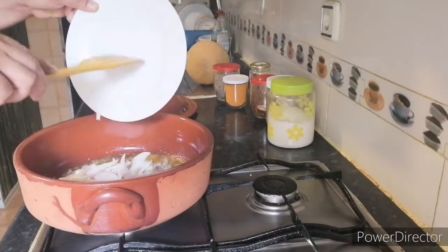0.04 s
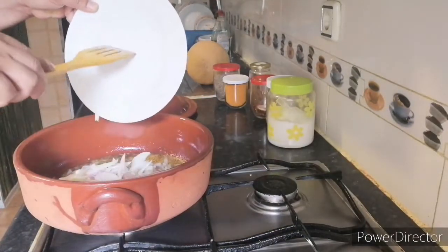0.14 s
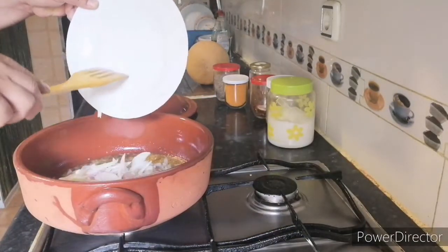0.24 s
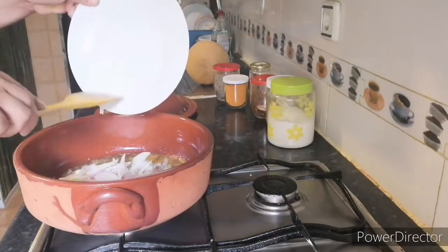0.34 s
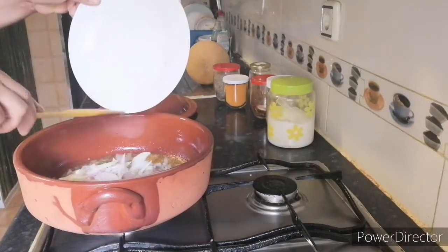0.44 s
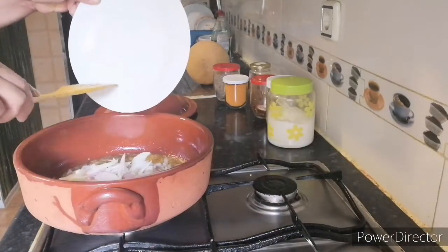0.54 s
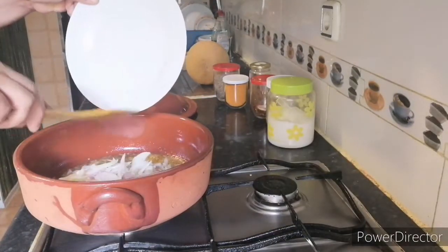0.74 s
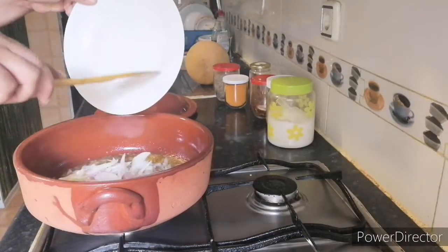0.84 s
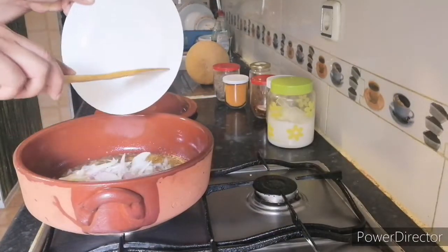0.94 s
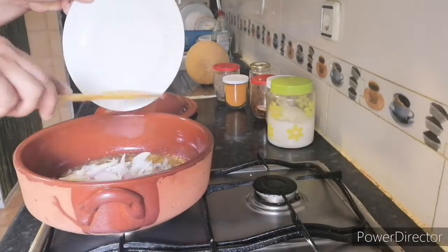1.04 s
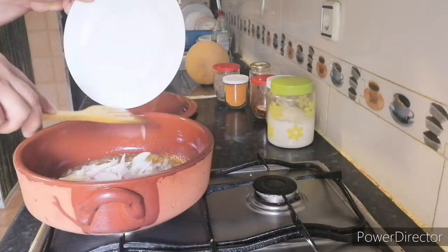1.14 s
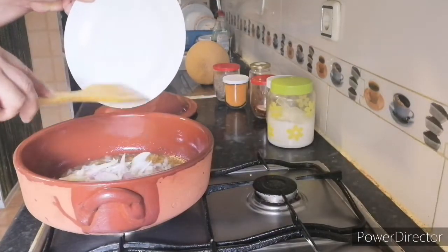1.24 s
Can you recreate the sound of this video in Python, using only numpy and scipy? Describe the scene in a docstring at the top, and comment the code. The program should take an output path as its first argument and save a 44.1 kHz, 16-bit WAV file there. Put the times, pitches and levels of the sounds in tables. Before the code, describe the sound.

Wooden spatula knocks on a china plate, two firm clacks and light taps over faint sizzling

```python
"""A wooden spatula knocks onion scraps off a china plate held over a clay pot: two firm knocks, a few light taps.
Each contact rings the plate and spatula as fading sine waves, with a woody thud pulse and a crack of noise.
The holding hand damps the plate, so each clack is short and the tiled kitchen carries it on as an echo.
The blade's soft wipes are brief swells of noise; onions sizzle faintly in the oil as hiss and random spits.
A low room rumble, also shaped noise, lies underneath."""
import sys
import numpy as np
from scipy import signal
from scipy.fft import rfft, irfft, next_fast_len
from scipy.io import wavfile
from scipy.ndimage import uniform_filter1d

SR = 44100
rng = np.random.default_rng(int(sys.argv[2]) if len(sys.argv) > 2 else 0)


def put_to_file(sound):
    """Save the sound as 16-bit audio at rate SR, in the file named by the first command-line argument."""
    columns = np.atleast_2d(sound).T  # one column per channel
    safe = np.clip(columns, -1, 1)
    whole_steps = np.round(safe * 32767)
    wavfile.write(sys.argv[1], SR, whole_steps.astype(np.int16))


N = 57330  # length in samples, 1.3 s


def amp(db):
    """Turns decibels into a gain: every 20 dB is a factor of ten."""
    return 10 ** (np.asarray(db) / 20)


def unit(x):
    """Scales a sound to an average (rms) strength of 1."""
    return x / np.sqrt(np.mean(x ** 2) + 1e-20)


def along(points, hz):
    """Reads a curve of (pitch_hz, value) points, with pitch spaced by ratio as the ear hears it."""
    point_hz, value = np.transpose(points)
    return np.interp(np.log(hz + 1), np.log(point_hz + 1), value)


def filtered(x, response):
    """Multiplies each frequency of a sound by the response at that frequency."""
    size = x.shape[-1]
    padded = next_fast_len(size + 8192)  # spare silence keeps the end from wrapping onto the start
    spectrum = rfft(x, padded) * response(np.fft.rfftfreq(padded, 1 / SR))
    return irfft(spectrum, padded)[..., :size]


def sides(pan_db):
    """Left and right gains whose levels differ by pan_db; positive leans left."""
    return amp(np.array([[0.5], [-0.5]]) * pan_db)


def dying(t, t60):
    """A fade that falls by 60 dB in t60 seconds."""
    return np.exp(-np.log(1000) * t / t60)


# How alike the left and right noise are: pitch_hz, likeness (1 = same, 0 = unrelated)
LEFT_RIGHT_LIKENESS = [(40, 0.4), (200, 0.56), (600, 0.68), (1500, -0.087), (4000, 0.044), (12000, -0.064)]


def noise(colour, size):
    """Coloured stereo noise of rms 1: a shared middle plus a difference, with the bass more alike."""
    def mid_and_side(hz):
        angle = np.arccos(np.clip(along(LEFT_RIGHT_LIKENESS, hz), -1, 1)) / 2
        return amp(along(colour, hz)) * [np.cos(angle), np.sin(angle)]

    mid, side = filtered(rng.standard_normal((2, size)), mid_and_side)
    return unit(np.array([mid + side, mid - side]))


def push(colour):
    """One pulse of the given colour, peak 1, with its energy as early as that colour allows."""
    size = 4096
    # Folding the cepstrum (the spectrum of the log spectrum) makes the pulse start at once.
    cepstrum = irfft(np.log(amp(along(colour, np.fft.rfftfreq(size, 1 / SR)))))
    cepstrum[1:size // 2] *= 2
    cepstrum[size // 2 + 1:] = 0
    pulse = irfft(np.exp(rfft(cepstrum)))
    return pulse / np.abs(pulse).max()


# Ringing tones of plate and spatula: pitch_hz, t60_s, then relative level_db for each kind of contact:
# face_knock_db, rim_knock_db, glancing_tap_db, soft_tap_db
RINGING_TONES = [ (353, 0.024, -16, -11.5, -22, -16), (513, 0.024, -6, -47, -4.5, -6),
                 (651, 0.027, -10, -25, -4, -8), (814, 0.028, -10, -1.5, -33, -3),
                 (936, 0.055, -9.5, -18, -23, -12), (1142, 0.017, -25, 5.5, -33, -17),
                 (1463, 0.053, -11, -17, -29, -13), (1813.6, 0.047, -1, 8.5, 6, 1),
                 (1948, 0.017, 10.5, -24, 6, -21), (2254, 0.034, 1.5, -0.5, -8, -32),
                 (2420, 0.04, -2.5, -10, -21, -12), (2662, 0.031, -5, 2, -24, -25),
                 (2813, 0.042, -8.5, 4.5, -11, -24), (2913, 0.051, 11, -33, -31, -28),
                 (3984, 0.13, -17, -43, -11, -39), (4148, 0.065, -25, -6.5, -24, -31),
                 (4470, 0.021, -30, -36, -28, -5), (5070, .04, -20, -33, -3.5, -27),
                 (6900, 0.071, -49, -18, -9, -32)]
# Tones that the hand hardly damps: pitch_hz, t60_s, relative level_db
PLATE_HUM = [(1552, 1, -31.5), (1740, 0.33, -51)]
# Contacts: start_s, ring_db, kind (0 face, 1 rim, 2 glancing, 3 soft), thud_db, crack_db, left_right_db
KNOCKS = [ (0.2424, -22.5, 0, -23, -33, 4), (.4060, -73, 2, -62, -65, -7),
          (.4263, -33.5, 2, -40.5, -33.5, 5), (0.5553, -38.5, 3, -32.5, -38.5, 4.5),
          (.7104, -34.5, 3, -42, -49, 4), (1.0488, -24.5, 1, -21.5, -29, 4.5),
          (1.0565, -42, 2, -34, -35, 9.5)]
# Colour of the woody thud: pitch_hz, relative level_db
THUD_COLOUR = [(30, -35), (70, -12), (130, -13), (220, -3), (400, 2), (700, -6.5), (1200, -4), (2500, -3),
               (3500, -19.5), (8000, -70)]
# Colour of the dry crack: pitch_hz, relative level_db
CRACK_COLOUR = [(500, -18), (2000, 8.5), (3900, 4), (5200, 3.5), (6700, -7), (8500, -15), (14000, -29)]
ATTACK_S, CRACK_T60_S = 0.0014, 0.049  # rise of ring and crack, fade of the crack
SPREAD_DB = 0.9  # typical random change of each tone from blow to blow
LEFT_LEAD_S = 0.00009  # the direct ring and thud reach the left side this much sooner


def left_lead(hz):
    """Moves the left side half the lead earlier and the right side half the lead later."""
    return np.exp(1j * np.pi * hz * LEFT_LEAD_S * np.array([[1], [-1]]))


def plate_ring(t, ring_db, kind):
    """The struck plate and spatula ring in many fading tones, mixed by where and how the blade lands."""
    tones = [(hz, t60, levels[int(round(kind))]) for hz, t60, *levels in RINGING_TONES]
    ring = np.zeros(N)
    for hz, t60, db in [*tones, *PLATE_HUM]:
        level = amp(ring_db + db + SPREAD_DB * rng.normal())
        ring += level * dying(t, t60) * np.sin(2 * np.pi * (hz * t + rng.random()))
    return ring


def knocks():
    """Each contact sets off a ring, a woody thud and a dry crack, and the kitchen answers."""
    out = np.zeros((2, N))
    for start_s, ring_db, kind, thud_db, crack_db, left_right_db in KNOCKS:
        t = np.maximum(np.arange(N) / SR - start_s, 0)
        rise = 1 - np.exp(-t / ATTACK_S)  # zero until the contact
        ring = rise * plate_ring(t, ring_db, kind)
        thud = amp(thud_db) * np.pad(push(THUD_COLOUR), (round(start_s * SR), N))[:N]
        crack = amp(crack_db) * rise * dying(t, CRACK_T60_S) * noise(CRACK_COLOUR, size=N)
        direct = sides(left_right_db) * filtered(ring + thud, left_lead)
        out += direct + crack + kitchen(ring + thud + crack[0])
    return out


# How long the echo lasts at each pitch: pitch_hz, t60_s
KITCHEN_T60 = [(150, 0.36), (600, 0.34), (1000, 0.47), (2000, 0.49), (3000, 0.41), (4200, 0.46),
               (10000, 0.34)]
# Colour of the echo: pitch_hz, relative level_db
KITCHEN_COLOUR = [(100, -2), (400, 0), (1000, 1), (2000, 3.5), (3000, -3.5), (4200, -1), (10000, -4)]
WALL_DELAY_S, BUILD_S = 0.0028, 0.012  # wait for the first wall, growth time of the echo


def kitchen(x):
    """Tiled walls answer with a blurred echo that builds up and dies, with no room note standing out."""
    flat_noise = noise([(20, 0), (20000, 0)], size=SR * 3 // 5)
    hz, t, pieces = signal.stft(flat_noise, SR, nperseg=256)
    fading = pieces * dying(t, along(KITCHEN_T60, hz)[:, None])
    tail = signal.istft(fading, SR, nperseg=256)[1]
    age = np.maximum(np.arange(tail.shape[1]) / SR - WALL_DELAY_S, 0)
    swell = 1 - np.exp(-age / BUILD_S)
    spectrum = rfft(tail * swell)
    # Even out the peaks and dips, then give the echo its colour.
    power = np.abs(spectrum) ** 2
    even = np.sqrt(power.mean() / np.abs(uniform_filter1d(power, size=36, axis=1)))
    colour = amp(along(KITCHEN_COLOUR, np.fft.rfftfreq(len(age), 1 / SR)))
    echo = irfft(spectrum * even * colour)[:, :SR // 2] / np.linalg.norm(tail[0])
    return signal.fftconvolve(x[None], echo, axes=1)[:, :N]


# Strokes of the blade: middle_s, length_s (from the middle until the stroke is nearly gone), level_db
WIPES = [(0.466, 0.074, -59.5), (0.61, 0.022, -64), (0.896, 0.021, -52.5)]
# Colour of the wiping: pitch_hz, relative level_db
WIPE_COLOUR = [(800, -31), (2800, -14), (3800, 25), (4500, -8), (7000, -40), (14000, -44)]


def wipes():
    """The wet blade slides briefly over the glaze, as noise that swells and fades."""
    t = np.arange(N) / SR
    stroke = np.zeros(N)
    for middle_s, length_s, level_db in WIPES:
        stroke += amp(level_db) * np.exp(-2 * ((t - middle_s) / length_s) ** 2)
    return stroke * noise(WIPE_COLOUR, size=N)


# Colour of the sizzle: pitch_hz, relative level_db
SIZZLE_COLOUR = [(500, -19), (1000, -12), (1500, -4.5), (2200, -4.5), (3000, -3.5), (3900, -2),
                 (4400, -3.5), (5200, -4), (6800, -5.5), (8500, -9), (10000, -7), (11800, -5),
                 (13000, -11.5), (15000, -15.5)]
# Which side the sizzle leans to: pitch_hz, left_right_db
SIZZLE_PAN = [(1300, -5), (2400, 0.5), (4400, 0.5), (6300, -0.5), (8100, -1.5), (10000, -1.5),
              (12000, 12.5), (15000, 11)]
SIZZLE_DB, SPIT_DB = -50, -61.5  # rms levels of the hiss and of all the spits together
SPITS_PER_S = 440  # average rate on each side


def sizzle_lean(hz):
    """Tilts each pitch to one side while the power of both sides together stays the same."""
    gains = sides(along(SIZZLE_PAN, hz))
    return gains / np.sqrt(np.mean(gains ** 2, axis=0))


def sizzle():
    """Countless tiny steam bubbles merge into a hiss, with separate random spits added."""
    happens = rng.random((2, N)) < SPITS_PER_S / SR
    bursts = happens * rng.standard_normal((2, N))
    spits = unit(filtered(bursts, lambda hz: amp(along(SIZZLE_COLOUR, hz))))
    hiss = noise(SIZZLE_COLOUR, size=N)
    return filtered(amp(SIZZLE_DB) * hiss + amp(SPIT_DB) * spits, sizzle_lean)


# Colour of the room rumble: pitch_hz, relative level_db
RUMBLE_COLOUR = [(20, -7), (32, -11), (42, 2.5), (55, -10), (120, -10.5), (160, -13), (200, -6), (300, -21),
                 (460, -10), (800, -10), (1500, -7.5), (2500, -48)]
RUMBLE_DB = -59  # rms level


def rumble():
    """The room's low rumble: steady noise, strongest in the bass."""
    return amp(RUMBLE_DB) * noise(RUMBLE_COLOUR, size=N)


def scene():
    """Spatula and plate over the frying and the room's rumble."""
    return knocks() + wipes() + sizzle() + rumble()


TOP_HZ = 15200  # upper band limit


def record(dry):
    """Keeps only the frequencies below the band limit."""
    return filtered(dry, lambda hz: hz < TOP_HZ)


dry = scene()
out = record(dry)
put_to_file(out)
```